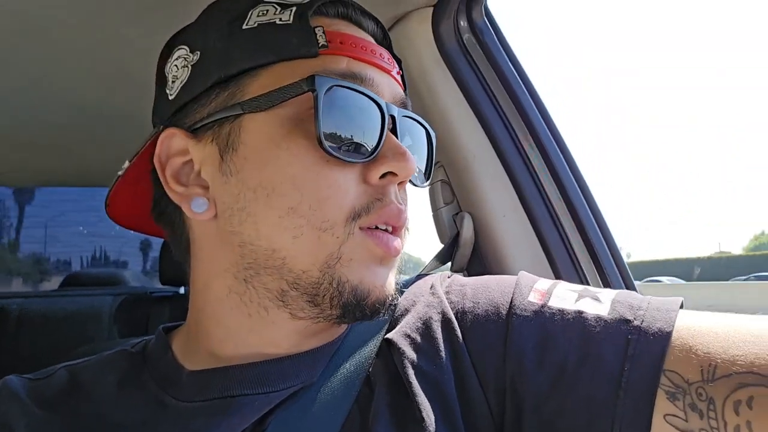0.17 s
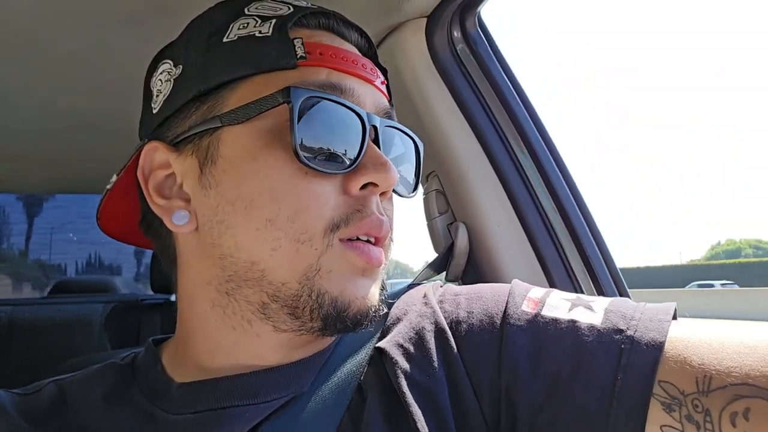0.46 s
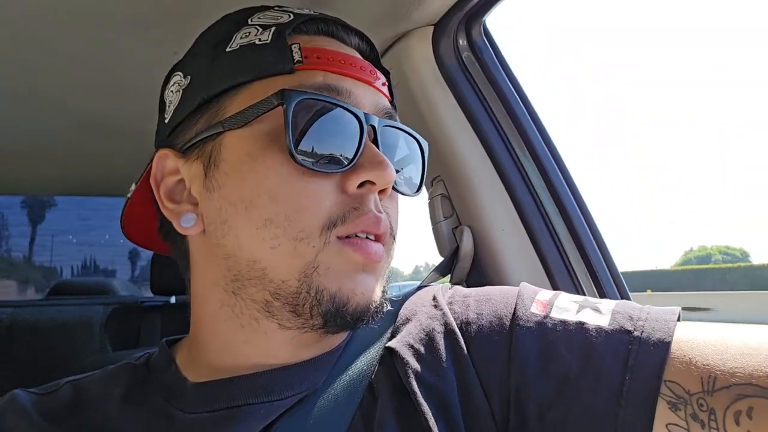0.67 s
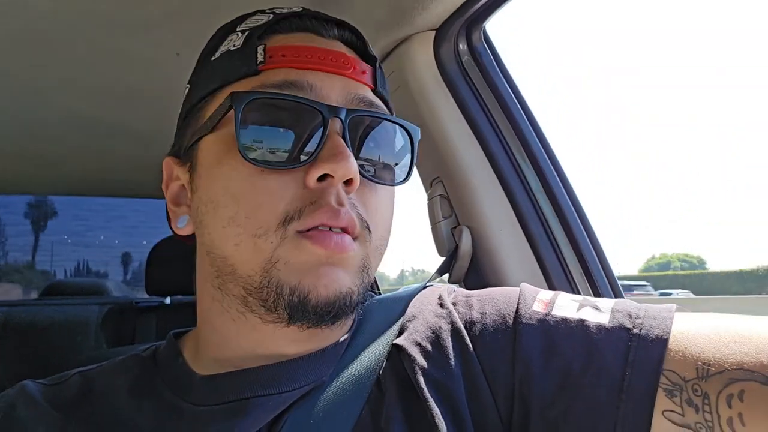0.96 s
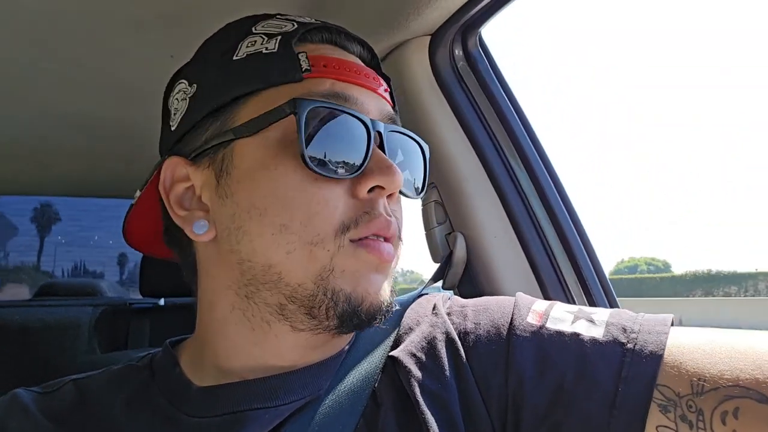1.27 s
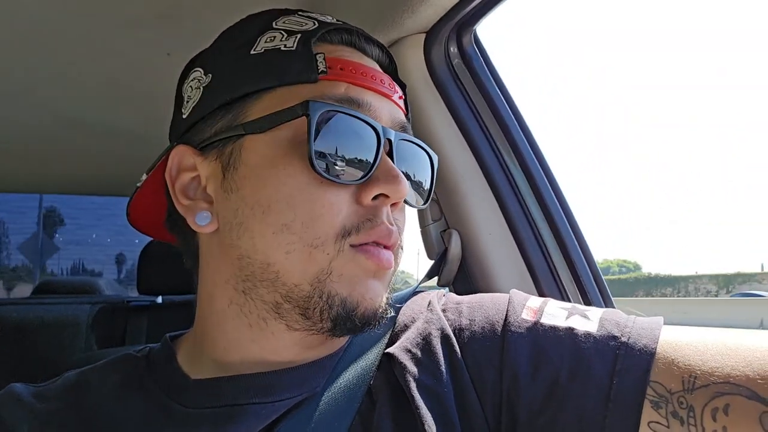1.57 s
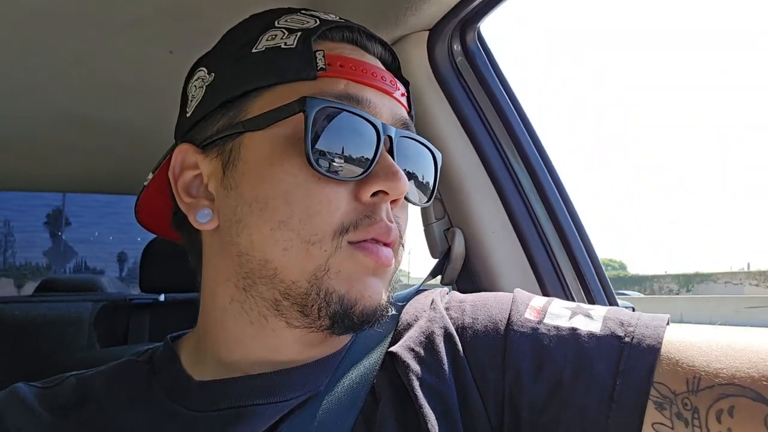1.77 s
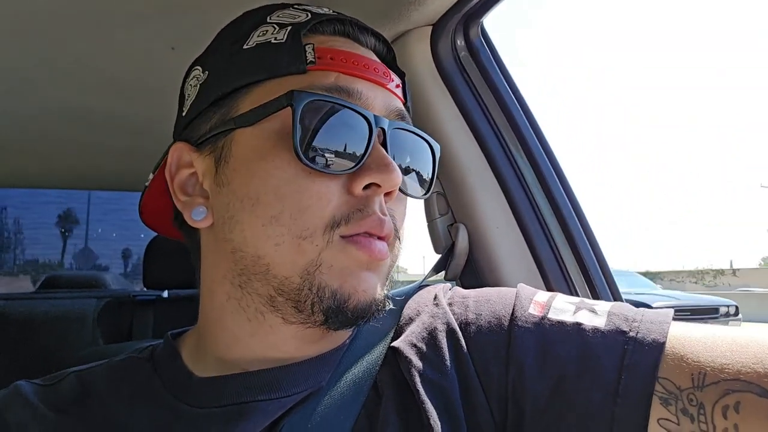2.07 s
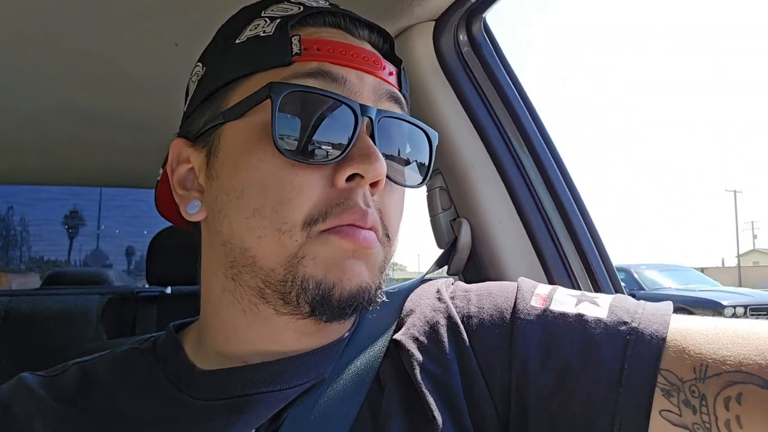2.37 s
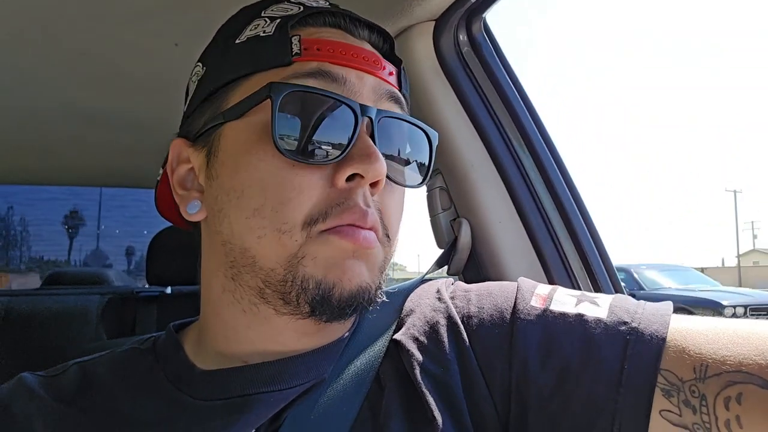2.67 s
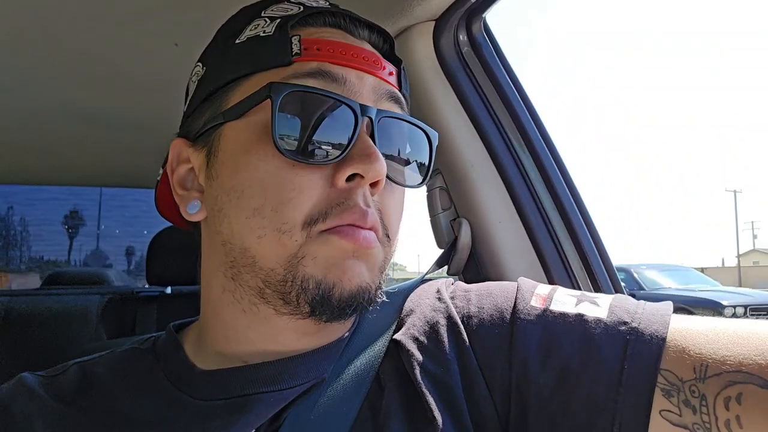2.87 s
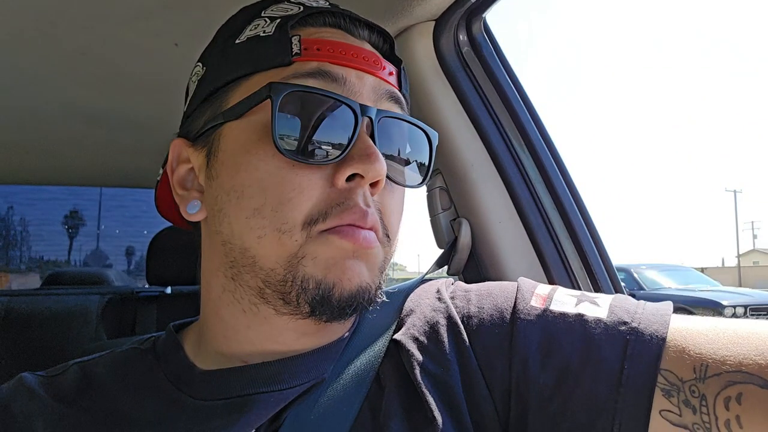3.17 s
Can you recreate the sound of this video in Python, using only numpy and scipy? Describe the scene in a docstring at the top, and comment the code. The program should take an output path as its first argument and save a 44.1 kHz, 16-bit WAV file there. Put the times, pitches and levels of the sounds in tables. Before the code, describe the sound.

Inside a moving car, a phone with two microphones picks up heavy low road rumble, window-side tyre noise and brief low wind puffs, then dull bumps, small trim taps and a gentle passing-traffic swell.

```python
"""The boom of a car cabin on a highway, heard by a phone with two microphones a hand apart: noise shaped by cabin modes.
Tyre roar and air hiss come in from the window side as coloured noise and swell as traffic draws alongside.
Draughts puff low noise on one microphone or the other; a small lip click is four ticks of damped modes.
Road bumps and loose trim taps are decaying sines; brief swells in the traffic noise are short bands of noise."""
import sys
import numpy as np
from scipy import signal
from scipy.fft import rfft, irfft
from scipy.io import wavfile
from scipy.ndimage import uniform_filter1d, minimum_filter1d

SR = 44100
rng = np.random.default_rng(int(sys.argv[2]) if len(sys.argv) > 2 else 0)


def store_pcm(level_fs):
    """Save levels as 16-bit WAV."""
    pcm = np.round(np.clip(level_fs, -1, 1) * 32767).astype(np.int16)
    wavfile.write(sys.argv[1], SR, np.atleast_2d(pcm).T)


def field_ratio(decibels):
    """Amplitude ratio for a level in dB (20 dB per decade); scalars and array-likes work."""
    return 10 ** (np.asarray(decibels, dtype=float) / 20)


N = 145530  # samples, 3.3 s


def evened(x):
    """Normalisation: divides a signal by its root mean square, so that its rms is 1."""
    return x / np.sqrt(np.mean(abs(x) ** 2) + 1e-20)


def read(points, hz):
    """Spectral envelope: interpolates a table linearly over log frequency."""
    f, value = np.transpose(points)
    return np.interp(np.log(hz + 1), np.log(f + 1), value)


def lifts(bands, hz):
    """Resonance: each mode lifts the spectrum in dB by a Lorentzian curve of the given width."""
    return sum(db / (1 + (2 * (hz - f) / width) ** 2) for f, width, db in bands)


def frame_grid(size):
    """Short-time Fourier analysis: frame times in a column and bin frequencies in Hz."""
    times = np.arange(N * 4 // size + 5) * size / 4 / SR
    return times[:, None], np.fft.rfftfreq(size, 1 / SR)


def noise(field_db, size, same, lead_s=0., patchy_db=0., cells=(1, 1)):
    """Partial coherence: the left noise holds a share of the right, lead_s early, plus its own noise."""
    t, hz = frame_grid(size)
    a, b, c, d, patch = np.moveaxis(rng.standard_normal((len(t), len(hz), 5)), 2, 0)
    # level patches, smoothed over cells of (frames, bins)
    patch = uniform_filter1d(patch, cells[0], 0)
    patch = evened(uniform_filter1d(patch, cells[1], 1))
    same = np.clip(same, 0, 1)
    right = a + 1j * b
    lead = np.exp(2j * np.pi * hz * lead_s)
    left = same * right * lead + np.sqrt(1 - same ** 2) * (c + 1j * d)
    z = np.array([left, right]) * field_ratio(field_db + patchy_db * patch)
    return signal.istft(np.swapaxes(z, 1, 2), nperseg=size, noverlap=size * 3 // 4)[1][:, :N]


# Level curve of the boom. Each row: time in seconds, level in dB.
BOOM_LEVEL = [(0, -20), (.14, -15), (.22, -18.5), (.33, -13), (.44, -23.5), (.52, -11.5), (.68, -19.5),
              (.78, -12.5), (.84, -18), (.97, -13.5), (1.12, -16.5), (1.37, -21), (1.44, -16.5), (1.7, -16),
              (1.85, -14.5), (1.96, -19), (2.1, -13.5), (2.38, -15), (2.49, -12), (2.75, -17.5),
              (2.86, -14), (3.03, -15), (3.19, -12.5), (3.3, -21.5)]
# Spectrum of the boom between its modes. Each row: frequency in Hz, level in dB.
BOOM_COLOUR = [(8, -56), (16, -1), (23, -8), (45, 2), (65, -3), (100, -13.5), (180, -21), (300, -26),
               (550, -33), (800, -36.5), (1200, -67)]
# Standing waves of the cabin. Each row: frequency in Hz, width in Hz, lift in dB.
CABIN_MODES = [(47.1, 15.4, 5.5), (93.9, 4, 10.5), (132, 5.4, 5), (152.4, 22.7, 6.5), (238.7, 22.6, 5.5)]
# How far the spectrum follows the swell. Each row: frequency in Hz, share of the swell in dB from 0 to 1.
BOOM_FOLLOW = [(80, 0.89), (130, 0.21)]
# Left-right likeness of the boom. Each row: frequency in Hz, coherence from 0 to 1.
BOOM_COHERENCE = [(40, .98), (150, .95), (600, .9)]


def boom():
    """Modal resonance: road shake and buffeting ring the low cabin modes; the lowest ones surge most."""
    hz = frame_grid(4096)[1]
    s, db = np.transpose(BOOM_LEVEL)
    colour_db = read(BOOM_COLOUR, hz) + lifts(CABIN_MODES, hz)
    still = evened(noise(colour_db, 4096, read(BOOM_COHERENCE, hz), lead_s=0.000244, patchy_db=1.5))
    t, hz = frame_grid(1024)
    z = signal.stft(still, nperseg=1024, noverlap=768)[2]
    # chance lumps of the noise, in dB, at each frame
    power = uniform_filter1d((still ** 2).mean(0), size=2400)
    at_frame = np.minimum(np.arange(z.shape[2]) * 256, N - 1)
    lumps_db = 10 * np.log10(power[at_frame] + 0.056)
    # the swell takes most of these lumps away
    curve_db = np.interp(t[:z.shape[2]], s, db - db.mean())
    swell_db = (curve_db - 0.85 * lumps_db[:, None]) * read(BOOM_FOLLOW, hz)
    swelling = signal.istft(z * field_ratio(swell_db.T), nperseg=1024, noverlap=768)[1][:, :N]
    return field_ratio(db.mean()) * swelling


# Left-right likeness of the sound from the window. Each row: frequency in Hz, coherence from 0 to 1.
WINDOW_COHERENCE = [(900, 0.059), (1400, 0.71), (2100, 0.45), (2600, 0.073), (15000, 0.04)]


def window_noise(colour, bands, patchy_db, cells):
    """Arrival-time difference: sound from the window side reaches the left microphone first."""
    hz = frame_grid(1024)[1]
    colour_db = read(colour, hz) + lifts(bands, hz)
    same = read(WINDOW_COHERENCE, hz)
    return evened(noise(colour_db, 1024, same, lead_s=0.00048, patchy_db=patchy_db, cells=cells))


# Traffic and road outside, also played by air_hiss. Each row: time in seconds, tyre roar in dB, air hiss in dB.
OUTSIDE_LEVELS = [(0, -34, -45), (.27, -34.5, -42), (.7, -34, -44.5), (1.18, -34, -47), (1.3, -37, -46.5),
                  (1.42, -34, -47), (2.05, -33, -46.5), (2.35, -33.5, -44), (2.53, -32.5, -41.5),
                  (2.7, -32.5, -43), (2.89, -35.5, -42.5), (3.05, -34, -42), (3.3, -35.5, -40.5)]
# Spectrum of the tyre roar. Each row: frequency in Hz, level in dB.
ROAR_COLOUR = [(250, -11.5), (500, -3), (800, -1.5), (1200, -2.5), (1700, -5.5), (2100, -7), (2500, -19.5),
               (4000, -59)]
# Cabin echoes that ripple the roar. Each row: frequency in Hz, width in Hz, lift in dB.
ROAR_BANDS = [(597, 26, 2.5), (785.5, 40, 5.5), (1033, 35, 1), (1600, 80, 2)]


def tyre_roar():
    """Amplitude modulation: tyre noise of fixed colour, rippled by cabin echoes, follows a level curve."""
    s, roar_db, _ = np.transpose(OUTSIDE_LEVELS)
    roar = window_noise(ROAR_COLOUR, ROAR_BANDS, patchy_db=2.5, cells=(30, 2))
    return field_ratio(np.interp(np.arange(N) / SR, s, roar_db)) * roar


# Spectrum of the air hiss. Each row: frequency in Hz, level in dB.
HISS_COLOUR = [(1500, -0.5), (2500, -1), (3800, 2), (4100, -2.5), (6600, -11.5), (9000, -14), (10200, -19),
               (11600, -9), (12600, -10.5), (15900, -15.5)]
# Cabin echoes that ripple the hiss. Each row: frequency in Hz, width in Hz, lift in dB.
HISS_BANDS = [(2750, 26, 4), (3010, 80, 5.5), (5430, 1100, 4), (7290, 230, 7), (11500, 360, 5.5)]


def air_hiss():
    """Broadband flow noise: air hiss, rippled by cabin echoes, follows a level curve with a slight flutter."""
    s, _, hiss_db = np.transpose(OUTSIDE_LEVELS)
    hiss = window_noise(HISS_COLOUR, HISS_BANDS, patchy_db=2., cells=(25, 3))
    flutter_db = 0.71 * evened(uniform_filter1d(rng.standard_normal(N), 900))
    return field_ratio(np.interp(np.arange(N) / SR, s, hiss_db) + flutter_db) * hiss


# Strong puffs. Each row: middle in seconds, length in seconds (three standard deviations of a bell curve),
# peak of the added level in dB, microphone (0 left, 1 right).
PUFFS = [(0.06, 0.053, -19.5, 1), (0.291, 0.045, -13.5, 0), (0.915, 0.039, -19, 1),
         (1.175, 0.034, -16.5, 1), (1.572, 0.061, -23.5, 1)]
# Spectrum of the wind. Each row: frequency in Hz, level in dB.
PUFF_COLOUR = [(30, -2), (80, 3), (250, -8.5), (450, -22), (1200, -62)]


def draughts():
    """Local turbulence: lumpy low wind, incoherent between the microphones, with a few strong puffs."""
    t, hz = np.arange(N) / SR, frame_grid(512)[1]
    wind = evened(noise(read(PUFF_COLOUR, hz), 512, same=0.))
    lumps = uniform_filter1d(rng.standard_normal((N, 2)), 1300, 0)
    lumps = evened(uniform_filter1d(lumps, 1300, 0)).T
    level = field_ratio(-39 + 6.5 * lumps)  # dB: middle level, rms of the lumps
    for middle, length, db, side in PUFFS:
        level[int(side > .5)] += field_ratio(db) * np.exp(-.5 * ((t - middle) / (length / 3)) ** 2)
    return wind * level


# Ticks of the lip click. Each row: start in seconds, drive level in dB,
# tilt of the drive in dB per octave above the lowest mode.
LIP_TICKS = [(.2338, -39, -9), (.2376, -32, 0), (.2418, -41, -2), (.2455, -38, -8)]
# Small modes of the mouth. Each row: nominal frequency in Hz, drive level in dB, 60 dB decay time in seconds.
LIP_MODES = [(3950, -1, 0.012), (4750, 3, 0.018), (5750, 6, 0.011), (7150, 2, .012), (11400, -8, 0.014),
             (15300, -7, 0.008)]


def lips():
    """Impulse response: a short cluster of ticks rings small damped modes, with a spit of noise."""
    t, out = np.arange(1500) / SR, np.zeros((2, N))
    lowest_hz = LIP_MODES[0][0]
    for s, db, tilt_db in LIP_TICKS:
        tick = np.zeros((2, len(t)))
        for hz, level, t60 in LIP_MODES:
            decay = field_ratio(level + tilt_db * np.log2(hz / lowest_hz) - 60 * t / t60)
            ring = np.sin(2 * np.pi * hz * rng.uniform(0.91, 1.03) * t)  # pitch varies between ticks
            spit = 0.23 * rng.standard_normal((2, len(t)))
            tick += decay * (ring + spit)
        start = round(s * SR)
        # the sample difference brightens the tick; it is 2 dB louder on the left
        out[:, start:start + len(t)] += field_ratio(db) * np.diff(tick, prepend=0) * field_ratio([[1.], [-1.]])
    return out


# Road bumps. Each row: start in seconds, drive level in dB, lift of the upper mode in dB.
BUMPS = [(.903, -18, -3), (1.765, -17, -13)]
# Lower and upper mode of the car body. Each row: frequency in Hz, 60 dB decay time in seconds.
BODY_MODES = [(262, 0.11), (550, 0.08)]


def bumps():
    """Damped free vibration: joints in the road knock the body, and its two modes ring briefly."""
    t, out = np.arange(6000) / SR, np.zeros(N)
    attack = np.minimum(t / 0.011, 1)
    low, high = (field_ratio(-60 * t / t60) * attack * np.sin(2 * np.pi * hz * t) for hz, t60 in BODY_MODES)
    for s, db, upper_db in BUMPS:
        start = round(s * SR)
        out[start:start + len(t)] += field_ratio(db) * (low + field_ratio(upper_db) * high)
    return out * field_ratio([[-2.], [2.]])  # 4 dB louder on the right


# Brief swells in the traffic noise. Each row: middle in seconds, length in seconds (between the 1/e points
# of power), level in dB before division by bandwidth, centre in Hz, half width in octaves (to 1/e of power).
SWISHES = [(1.01, 0.062, -40.5, 900, 0.07), (2.27, 0.09, -36, 750, 0.45), (2.375, 0.057, -35, 780, 0.6),
           (2.425, 0.017, -30.5, 820, 0.3), (2.53, 0.052, -54, 5200, .2), (2.41, 0.19, -44, 2050, 0.085),
           (2.557, 0.24, -39.5, 1290, 0.45), (2.71, 0.8, -48.5, 2490, 0.15), (3.6, 0.1, -47, 3350, 0.1),
           (3.08, 0.48, -59, 5600, 0.23)]


def swishes():
    """Time-frequency localisation: band noise swells as a bell curve in time and in log frequency."""
    t, hz = frame_grid(512)
    power = 1e-16
    for s, length, db, f, width in SWISHES:
        in_time = ((t - s) / (length / 2)) ** 2
        in_pitch = (np.log2((hz + 1) / f) / width) ** 2
        power = power + field_ratio(2 * db) / (f * width) * np.exp(-in_time - in_pitch)
    unit = np.std(noise(0., 512, same=0.))  # rms of flat noise
    return noise(10 * np.log10(power * SR / 2), 512, same=0.32, patchy_db=3.5, cells=(4, 2)) / unit


# Loose trim taps. Each row: start in seconds, drive level in dB, frequency in Hz.
TRIM_TAPS = [(1.0272, -22, 900), (2.409, -22, 1050), (2.423, -21, 760), (2.433, -22, 950)]


def trim_taps():
    """Damped oscillation: a loose bit of trim taps now and then, each tap a short decaying sine."""
    t, out = np.arange(6000) / SR, np.zeros(N)
    attack, t60 = np.minimum(t / .001, 1), .012  # 1 ms rise; 60 dB decay time in s
    for s, db, hz in TRIM_TAPS:
        start = round(s * SR)
        out[start:start + len(t)] += field_ratio(db - 60 * t / t60) * attack * np.sin(2 * np.pi * hz * t)
    return out * field_ratio([[-2.], [2.]])  # 4 dB louder on the right


def scene():
    """Superposition: the sound pressures of all sources add at the phone."""
    return boom() + tyre_roar() + air_hiss() + draughts() + lips() + bumps() + swishes() + trim_taps()


def band_limit(x):
    """A steep low-pass at the top of the band."""
    return signal.sosfilt(signal.butter(12, 15910, fs=SR, output="sos"), x)


# Colour difference of the microphones. Each row: frequency in Hz, left over right in dB.
LEFT_OVER_RIGHT = [(1000, 1.17), (2000, -2.5), (3300, -1), (5500, 0), (9000, 5), (11600, -2.5),
                   (13000, 3.5), (15500, 10)]


def record(dry):
    """Linear filtering, then gain control: microphone colours, a band limit and a limiter on the peaks."""
    hz = np.fft.rfftfreq(N, 1 / SR)
    tilt_db = read(LEFT_OVER_RIGHT, hz) / 2  # half to each side
    x = irfft(rfft(dry) * field_ratio([tilt_db, -tilt_db]) * (hz < 15750), N)
    # one gain for both channels aims at a ceiling of -5.5 dB, held and smoothed over 10 ms
    gain = np.minimum(1, field_ratio(-5.5) / (abs(x).max(0) + 1e-9))
    gain = uniform_filter1d(minimum_filter1d(gain, size=441), size=441)
    return band_limit(x * gain)


dry = scene()
out = record(dry)
store_pcm(out)
```